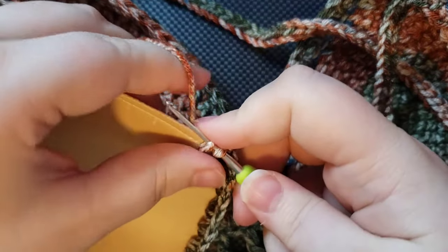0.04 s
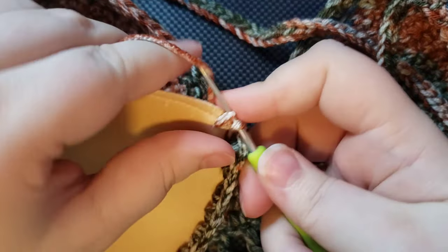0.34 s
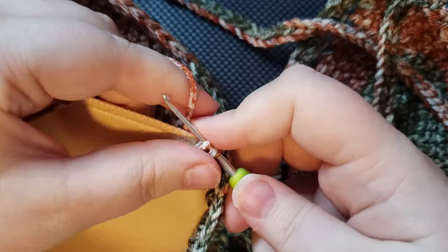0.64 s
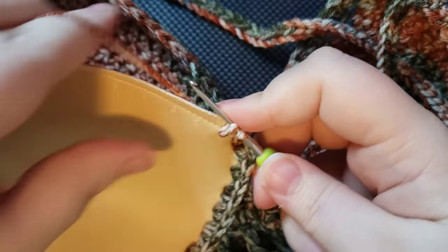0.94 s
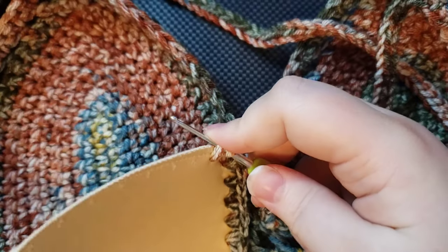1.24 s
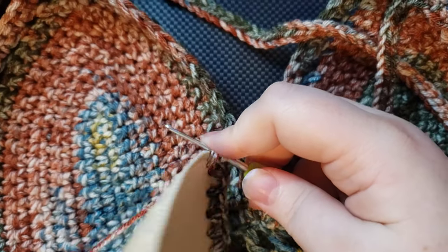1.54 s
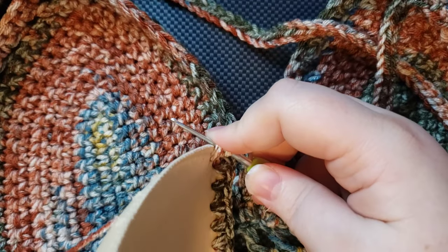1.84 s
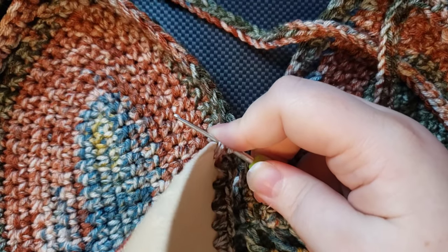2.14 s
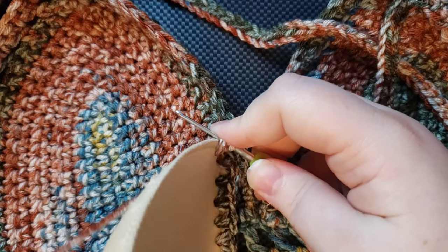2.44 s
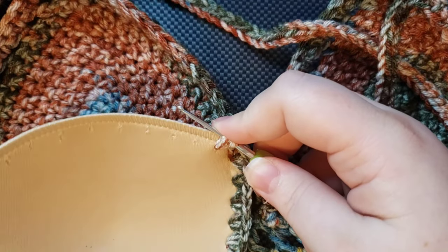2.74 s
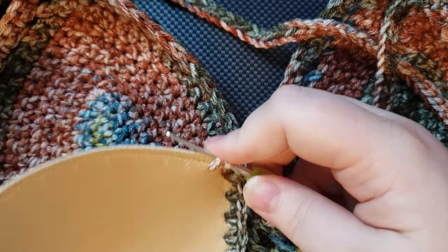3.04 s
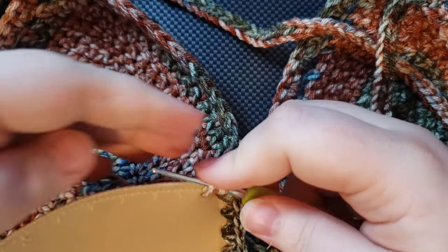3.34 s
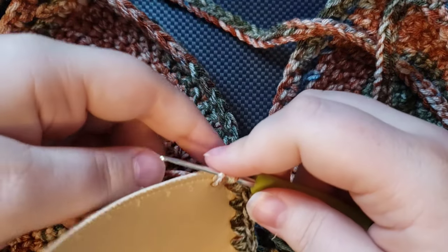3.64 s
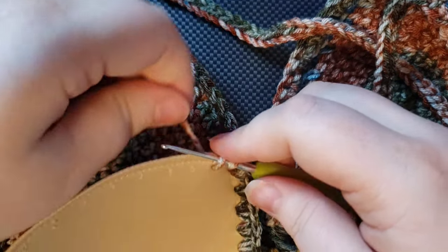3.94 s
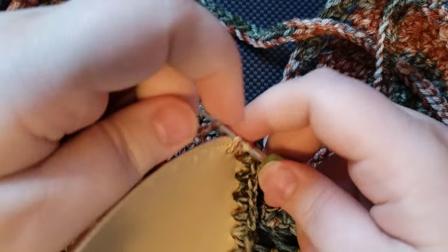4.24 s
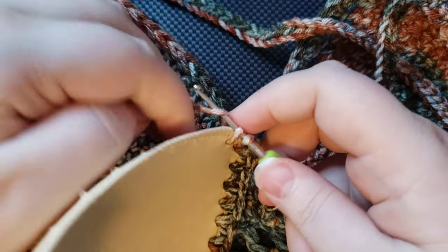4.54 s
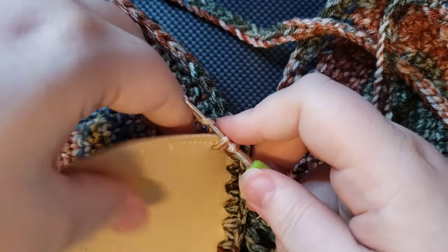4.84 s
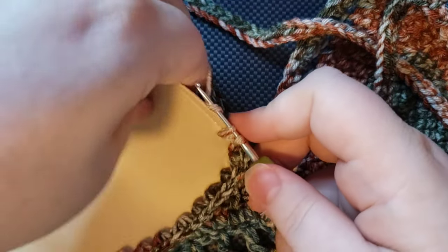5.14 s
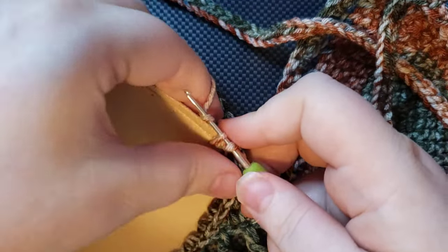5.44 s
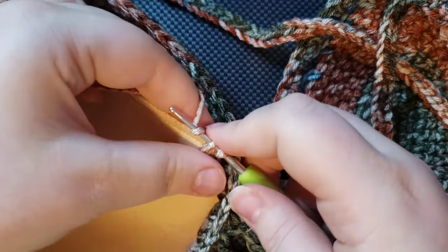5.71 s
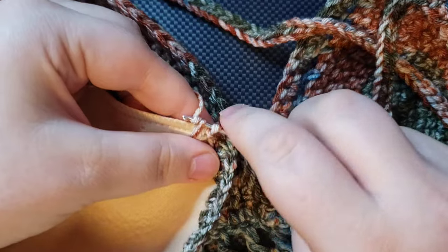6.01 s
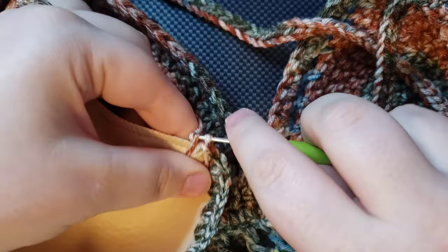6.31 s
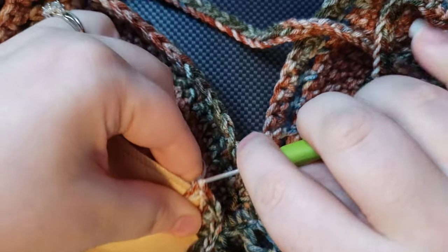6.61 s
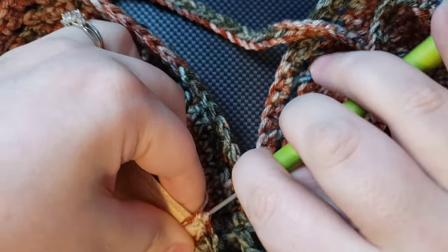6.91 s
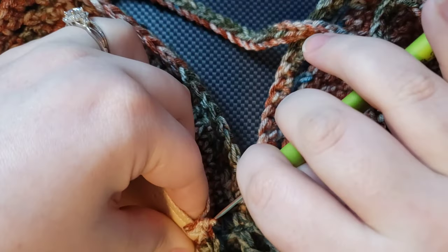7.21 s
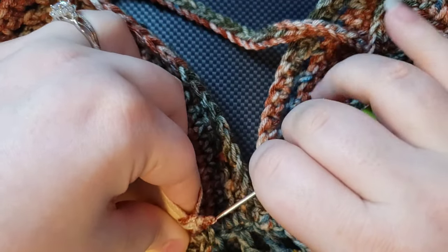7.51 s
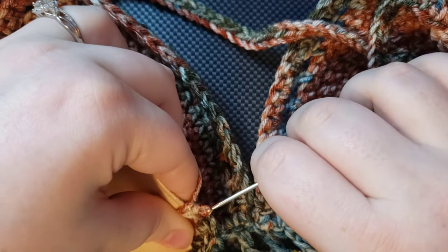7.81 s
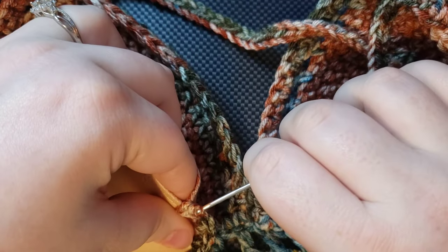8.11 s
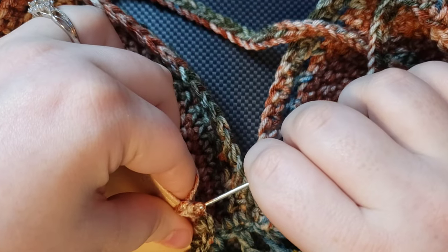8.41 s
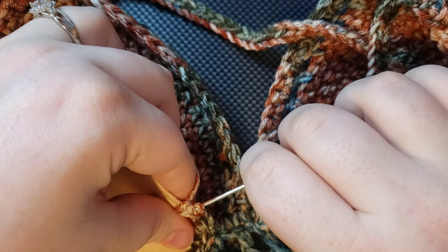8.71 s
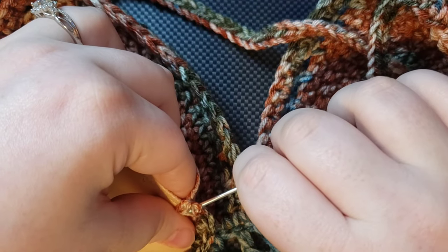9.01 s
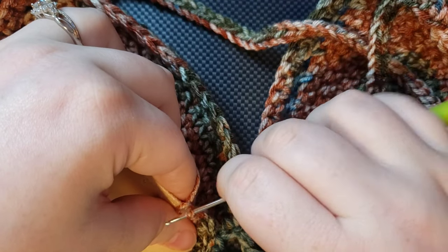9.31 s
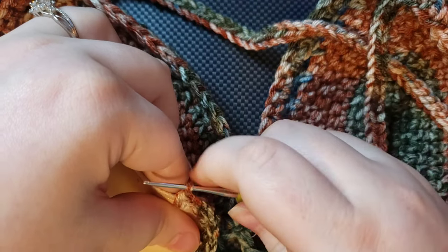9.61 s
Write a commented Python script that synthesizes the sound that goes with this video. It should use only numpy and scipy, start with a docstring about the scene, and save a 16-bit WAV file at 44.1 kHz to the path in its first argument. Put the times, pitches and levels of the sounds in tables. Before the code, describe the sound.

An appliance hums low indoors while yarn softly hisses through fingers and a crochet hook lightly ticks along a foam sole.

```python
"""In a quiet room where an appliance hums, someone crochets along the edge of a foam sole, close by.
A length of yarn slides through the fingers with a fine hiss. Hook and yarn rub through the stitches in
short strokes, fingertips brush the foam, and the soft sole flicks free once and shifts with a dull rub.
Each rub is noise from tiny fibres slipping and snagging. Now and then the hook gives a faint tick."""
import sys
import numpy as np
from scipy import signal
from scipy.fft import rfft, irfft
from scipy.io import wavfile

SR = 44100
rng = np.random.default_rng(int(sys.argv[2]) if len(sys.argv) > 2 else 0)


def dump_mix(stems):
    """Bounce the given channels to the path in sys.argv[1] as a 16-bit WAV at rate SR."""
    frames = np.atleast_2d(stems).T  # one column per channel
    limited = np.clip(frames, -1, 1)  # hard clip at full scale
    pcm = np.round(limited * 32767).astype(np.int16)
    wavfile.write(sys.argv[1], SR, pcm)


N = 429975

# In all tables, pan_db is left minus right, and a higher tilt_db_per_octave sounds brighter.
# The appliance's steady tones: pitch_hz, level_db, pan_db, left_lead_radians, waver_db
HUM_TONES = [(36.1, -64.5, -2, .45, 5.5), (55.83, -64, -0.5, 0.4, 1.5), (66.7, -61.5, 0, 0.4, 0.5),
             (119.93, -48, 1.3, .63, 0.16), (167.6, -75, -5.5, -1, -0.5), (222.9, -72, 0, .1, 4),
             (240.8, -69, 0, 0, 4.5), (282, -77.5, -4, .3, 2), (528, -94.5, -2, 0, 4)]
# The motor's tone fades away once and comes back: time_s, level_db
MOTOR_LEVELS = [(0, -51.5), (1.4, -46.5), (2.35, -66), (3.4, -49.5), (5.2, -54), (6.2, -48), (9.75, -48)]
# The fan's faint whine: pitch_hz, level_db_per_hz
WHINE_COLOUR = [(900, -170), (985, -127), (1010, -113), (1032, -112), (1060, -127), (1150, -170)]
# The room's low rumble: pitch_hz, level_db_per_hz
RUMBLE_COLOUR = [(18, -94), (30, -81.5), (45, -75.5), (60, -64.5), (82, -68.5), (110, -73.5), (185, -84.5),
                 (232, -74.5), (275, -83.5), (305, -82), (355, -93.5), (430, -96.5), (560, -106),
                 (1200, -130), (3000, -170)]
# Faint air noise and microphone hiss: pitch_hz, level_db_per_hz
AIR_COLOUR = [(300, -106), (600, -103.5), (820, -103), (900, -110.5), (1100, -110), (1780, -112.3),
              (2400, -116.7), (3400, -118.7), (5600, -123.2), (7000, -121.8), (8200, -126), (9700, -123.5),
              (12000, -116.8), (13500, -116.3), (15000, -112.2)]
# How alike the rumble is in both ears: pitch_hz, likeness (1 is the same sound)
RUMBLE_LIKENESS = [(30, 0.99), (60, 0.95), (130, 0.97), (180, .72), (235, 1), (310, 0.69), (420, 0.46),
                   (640, 0.27)]
# How alike the air noise is in both ears: pitch_hz, likeness
AIR_LIKENESS = [(500, 0.16), (900, 0.53), (1500, 0.54), (2500, 0), (4000, 0.0077), (15000, 0)]
# Which way rumble and air noise lean: pitch_hz, pan_db
ROOM_BALANCE = [(60, 0.5), (300, -0.7), (470, 0.5), (600, -8), (850, -1.5), (1400, 0.2), (7000, 1.3),
                (11000, -1.5), (15000, -3)]
# Hook and yarn slide through a stitch: middle_s, half_length_s, level_db, pan_db, tilt_db_per_octave
STITCH_STROKES = [(.33, .03, -83, 4, -3), (1.023, 0.036, -66.5, 0, -4), (1.97, .05, -76, -4, -2),
                  (2.28, .039, -70.5, -2, -4), (3.611, 0.037, -73.5, -1, 0), (3.71, 0.037, -73, 1, 7),
                  (4.07, .03, -71, 6, 6), (4.631, .032, -58, 3, 15), (5.0, 0.096, -73.5, 3, 5),
                  (5.47, .03, -70, -3, 5), (5.815, .022, -76.5, 6, -6), (5.892, 0.035, -65.5, 2, -5),
                  (6.17, .055, -79, 5, -7), (6.425, 0.039, -79.5, 2, -5), (8.6, .025, -84, 4, -3),
                  (9.505, 0.052, -71, 8, 4)]
# The sound of yarn on the hook: pitch_hz, gain_db
STITCH_COLOUR = [(1000, -25), (3000, -16), (4500, -20.5), (5800, -10.5), (6550, 0), (7550, -1),
                 (8150, -8.5), (10000, -6.5), (12000, -4.5), (15500, -3)]
# Fingertips brush the foam: middle_s, half_length_s, level_db, pan_db, tilt_db_per_octave
FINGER_BRUSHES = [(2.14, .039, -75, -1, 7), (3.46, .07, -79, 3, -3), (3.705, .03, -75, 2, -1.5),
                  (4.07, .05, -80, 6, -4), (4.59, .04, -80, 6, 6), (5.67, 0.13, -78.5, 3, -0.5),
                  (6.19, .07, -77.5, 2, -1)]
# The sound of rubbed foam: pitch_hz, gain_db
FOAM_COLOUR = [(500, 5), (900, 3.5), (1400, -3), (2000, -0.5), (2800, -7.5), (3900, -8.5), (6000, -9),
               (15000, -25)]
# A long pull of yarn in several tugs, later a slow feed: middle_s, half_length_s, level_db, treble_pan_db
YARN_TUGS = [(1.103, 0.14, -65, 0), (1.36, 0.2, -71.5, -7), (1.603, 0.15, -63, -13), (1.96, 0.15, -66, -14),
             (2.14, 0.075, -63.5, -13), (2.276, 0.068, -63.5, -11), (2.46, 0.029, -69, -8),
             (2.67, .03, -74, -9), (2.85, .015, -72, -8), (4.603, .04, -70.5, 8), (5.4, 1.2, -78, 1)]
# The sound of yarn on skin: pitch_hz, gain_db
YARN_COLOUR = [(600, -10), (2000, -18), (3500, -11), (5900, -13), (6400, -10.5), (7700, -6.5), (8150, -14),
               (9800, -11.5), (11300, -6.5), (11850, -1), (13200, -3), (15500, 1)]
# The tones of the flicked sole: pitch_hz, gain_db, ring_s
SOLE_TONES = [(590, 2.5, 0.026), (1600, -6, .016), (2500, -5.5, 0.021)]
# The sole is let go and shifts on the yarn: middle_s, half_length_s, level_db, pan_db, tilt_db_per_octave
SOLE_SHIFTS = [(1.045, 0.03, -59.5, -9, -8), (1.501, 0.35, -70, -5.5, 3), (1.95, 0.28, -69.5, -4, 5.5),
               (4.451, .08, -72.5, -2, 7.5), (6.22, .08, -67, 4, -1)]
# The dull body of the sole: pitch_hz, gain_db
SOLE_COLOUR = [(200, -0.5), (330, 3), (480, -8), (700, -12), (1100, -37.5), (3000, -54), (10000, -70)]
# The hook clicks against nails and stitches: start_s, level_db, pan_db, pitch_hz
HOOK_TICKS = [(2.8371, -74, -6, 1900), (3.705, -63, 0, 1990), (4.5665, -59, 5, 3320), (4.582, -63, 5, 5360),
              (5.4476, -47.5, -6.5, 13600), (5.8787, -56, 6, 6800), (5.893, -54, 6, 7200),
              (6.0987, -54, 7, 6800)]
# The tones of the tapped hook: pitch_hz, gain_db, ring_s
HOOK_TONES = [(1114, -0.5, 0.076), (4624, -12, .06)]


def from_db(db):
    """Turn decibels into a number to multiply by."""
    return 10 ** (np.asarray(db) / 20)


def unit_level(sound):
    """Scale a sound to an average (rms) level of 1."""
    return sound / np.sqrt(np.mean(sound ** 2) + 1e-30)


def spectrum_hz(size):
    """The pitches in a spectrum, kept above zero."""
    return np.maximum(np.arange(size // 2 + 1) * SR / size, 1)


def at_hz(points, hz):
    """Read between the rows of a table by pitch."""
    known_hz, values = np.transpose(points)
    return np.interp(np.log(hz), np.log(known_hz), values)


def panned(pan_db):
    """Left and right gains for a level difference."""
    return from_db(np.array([[.5], [-.5]]) * pan_db)


def drift(turns_per_s, size):
    """A line that wanders at random around zero."""
    position = np.arange(size) * turns_per_s / SR
    count = int(position[-1]) + 2
    return np.interp(position, np.arange(count), rng.standard_normal(count))


def swell(t, half_length_s):
    """A movement speeds up, is fastest at t = 0, and slows down."""
    return 1 / np.cosh(np.minimum(np.sqrt(2) * np.abs(t) / half_length_s, 50))


def add(out, sound, start_s):
    """Mix a stereo sound in from start_s."""
    start = max(int(start_s * SR), 0)
    out[:, start:start + sound.shape[1]] += sound[:, :max(N - start, 0)]


def friction(colour, size, tilt_db_per_octave, snags_per_s, snag_db, clump_db):
    """Countless fibres slip as a fine hiss; now and then one snags and snaps free. Both come in clumps."""
    snags = (rng.random(size) < snags_per_s / SR) * rng.standard_normal((2, size))
    slips = rng.standard_normal((2, size)) + from_db(snag_db) * unit_level(snags)
    clumps = slips * from_db(clump_db * drift(140, size))
    hz, lowest_hz = spectrum_hz(size), colour[0][0]
    gain = from_db(at_hz(colour, hz) + tilt_db_per_octave * np.log2(np.maximum(hz, lowest_hz)))
    bass_cut = hz ** 2 / (hz ** 2 + lowest_hz ** 2)   # a small contact gives off little bass
    return unit_level(irfft(rfft(clumps) * gain * bass_cut, size))


def rubs(moves, colour, snags_per_s, snag_db, clump_db):
    """Each movement makes rubbing noise that grows and fades with its speed."""
    out = np.zeros((2, N))
    t = np.arange(-SR // 4, SR // 4) / SR
    for middle_s, half_length_s, level_db, pan_db, tilt in moves:
        speed = swell(t, half_length_s) * signal.windows.tukey(len(t), .5)
        hiss = friction(colour, len(t), tilt, snags_per_s, snag_db, clump_db)
        add(out, from_db(level_db) * speed * hiss * panned(pan_db), middle_s + t[0])
    return out


def knock(tones, start_s, level_db, pan_db, snap_db):
    """A dry snap, a faint scatter from things nearby, and tones that fall by 60 dB in ring_s."""
    snap_s, scatter_s, scatter_db = .00045, .014, -22
    out = np.zeros((2, N))
    t = np.arange(SR // 10) / SR
    ring = sum(from_db(gain_db) * np.sin(2 * np.pi * hz * t) * from_db(-60 * t / ring_s)
               for hz, gain_db, ring_s in tones)
    fade = np.exp(-t / snap_s) + from_db(scatter_db) * np.exp(-t / scatter_s)
    snap = .5 * rng.standard_normal((2, len(t))) * fade
    hardness = tones[0][0] / (SR / 2)   # a higher-pitched contact is harder, so its snap is brighter
    snap = signal.lfilter([1, -hardness], [1], snap)
    add(out, from_db(level_db) * (ring + from_db(snap_db) * snap) * panned(pan_db), start_s)
    return out


def appliance_hum():
    """Mains hum and fan tones; the motor turns just below the mains rate, and its tone swells and fades."""
    motor_hz, motor_lead_radians = 59.2, 0.4
    t = np.arange(N) / SR
    ears = np.array([[.5], [-.5]])
    motor_db = np.interp(t, *np.transpose(MOTOR_LEVELS))
    out = from_db(motor_db) * np.sin(2 * np.pi * motor_hz * t + motor_lead_radians * ears)
    for hz, level_db, pan_db, left_lead, waver_db in HUM_TONES:
        # Standing waves in the room give each tone its own place.
        phase = 2 * np.pi * (hz * t + rng.random()) + left_lead * ears
        out += from_db(level_db + waver_db * drift(3, N)) * np.sin(phase) * panned(pan_db)
    return np.sqrt(2) * out


def fan_whine():
    """The fan whines on the right: a narrow, unsteady band of noise."""
    gain = from_db(at_hz(WHINE_COLOUR, spectrum_hz(N))) * np.sqrt(SR / 2)
    return irfft(rfft(rng.standard_normal(N)) * gain, N) * panned(-10)


def room_noise(colour, likeness, left_lag_s):
    """Steady noise, partly alike in both ears; what comes from the right reaches the left ear later."""
    hz = spectrum_hz(N)
    shared, opposite = rfft(rng.standard_normal((2, N)))
    alike = np.clip(at_hz(likeness, hz), -.99, .99)
    pair = np.sqrt(1 + alike) * shared + np.sqrt(1 - alike) * opposite * [[1], [-1]]
    delay = np.exp(-2j * np.pi * hz * left_lag_s * np.array([[1], [0]]))
    gain = from_db(at_hz(colour, hz)) * panned(at_hz(ROOM_BALANCE, hz))
    return irfft(pair * delay * gain, N) * np.sqrt(SR) / 2


def stitch_strokes():
    """Hook and yarn rub through the stitches, brighter when the yarn is tight."""
    return rubs(STITCH_STROKES, STITCH_COLOUR, snags_per_s=470, snag_db=-7, clump_db=2.0)


def foam_rustle():
    """The foam rustles under the fingertips, and softly with every stroke and every shift of the sole."""
    stroke_db, stroke_tilt = -10, 1
    shift_db, shift_tilt = -10.5, -6.5
    moves = list(FINGER_BRUSHES)
    for middle_s, half_length_s, level_db, pan_db, tilt in STITCH_STROKES:
        lift_db = 0.76 * max(tilt, 0)   # tight, bright yarn lifts clear of the foam and rubs it less
        moves.append((middle_s, half_length_s, level_db + stroke_db - lift_db, pan_db, stroke_tilt))
    for middle_s, half_length_s, level_db, pan_db, _ in SOLE_SHIFTS:
        moves.append((middle_s, half_length_s, level_db + shift_db, pan_db, shift_tilt))
    return rubs(moves, FOAM_COLOUR, snags_per_s=150, snag_db=-10.5, clump_db=4.5)


def yarn_pull():
    """Tugs blend into one sliding hiss. The yarn passes to one side; only its top treble leans far over."""
    t = np.arange(N) / SR
    powers = np.array([(from_db(level_db) * swell(t - middle_s, half_length_s)) ** 2
                       for middle_s, half_length_s, level_db, _ in YARN_TUGS])
    total_power = powers.sum(axis=0)
    pan_db = np.array(YARN_TUGS)[:, -1] @ powers / total_power   # louder tugs count for more
    hiss = friction(YARN_COLOUR, N, tilt_db_per_octave=0.5, snags_per_s=700, snag_db=-8.5, clump_db=1.2)
    hiss *= np.sqrt(total_power)
    body = irfft(rfft(hiss) / (1 + (spectrum_hz(N) / 8500) ** 8), N)   # the part below 8500 Hz
    treble = hiss - body
    return from_db(0.5) * body * panned(0.16 * pan_db) + treble * panned(pan_db)


def sole_flick():
    """The sole flicks free of the fingers with one soft knock."""
    return knock(SOLE_TONES, start_s=1.029, level_db=-57.5, pan_db=-1, snap_db=-3)


def sole_shifts():
    """The soft sole slides on the yarn with a low, dull rub."""
    return rubs(SOLE_SHIFTS, SOLE_COLOUR, snags_per_s=89, snag_db=-9.5, clump_db=0.8)


def hook_ticks():
    """The hook clicks against nails and stitches; each click rings briefly at its own pitch."""
    ring_db, ring_cycles = -6, 27
    return sum(knock([(hz, ring_db, ring_cycles / hz)], start_s, level_db, pan_db, snap_db=1.5)
               for start_s, level_db, pan_db, hz in HOOK_TICKS)


def hook_tap():
    """One tap makes the hook ring a little longer."""
    return knock(HOOK_TONES, start_s=5.0291, level_db=-68.5, pan_db=10, snap_db=9)


def scene():
    """The steady sounds of the room, with the handwork on top."""
    room = appliance_hum() + fan_whine()
    room += room_noise(RUMBLE_COLOUR, RUMBLE_LIKENESS, left_lag_s=0)
    room += room_noise(AIR_COLOUR, AIR_LIKENESS, left_lag_s=0.000332)
    rubbing = stitch_strokes() + sole_shifts() + yarn_pull() + foam_rustle()
    knocks = hook_ticks() + hook_tap() + sole_flick()
    return room + rubbing + knocks


def record(dry):
    """Cut the very highest treble away steeply."""
    cutoff_hz = 15720
    return irfft(rfft(dry) / np.sqrt(1 + (spectrum_hz(N) / cutoff_hz) ** 400), N)


dry = scene()
out = record(dry)
dump_mix(out)
```